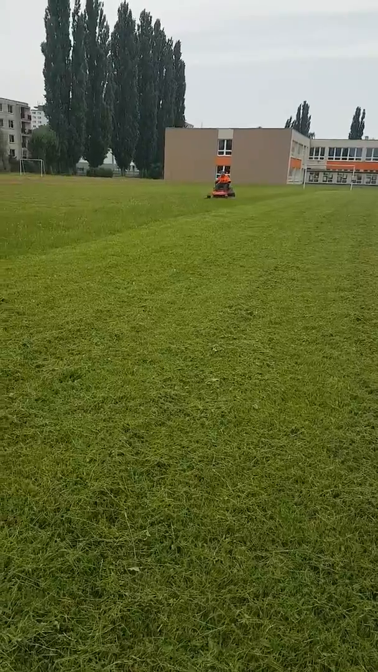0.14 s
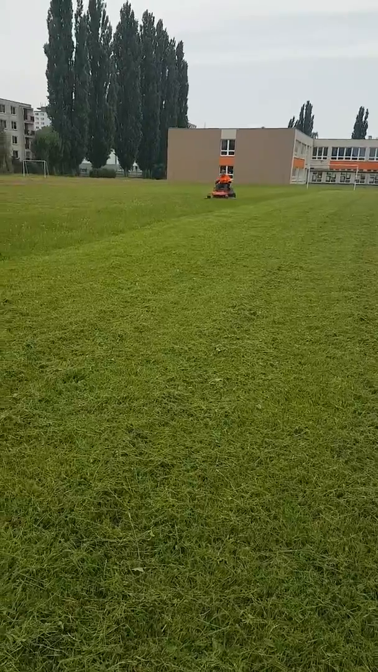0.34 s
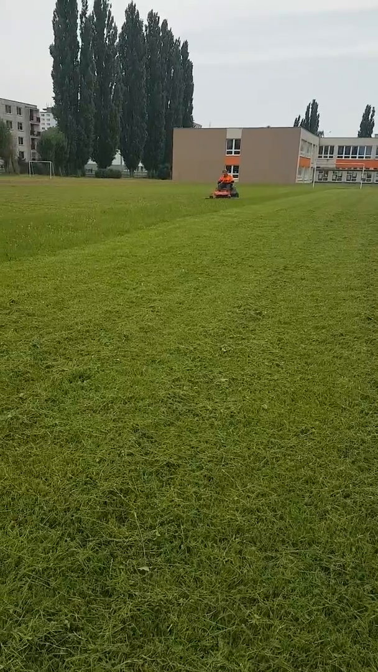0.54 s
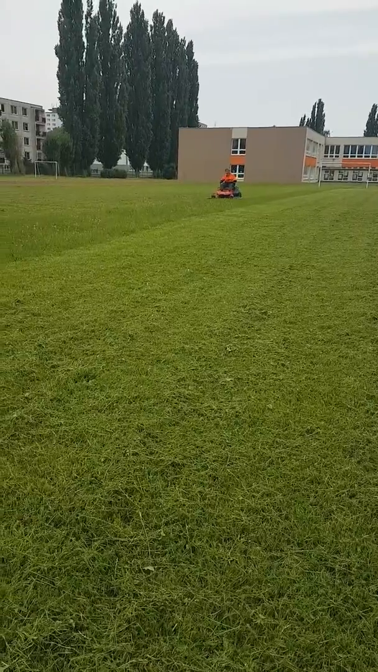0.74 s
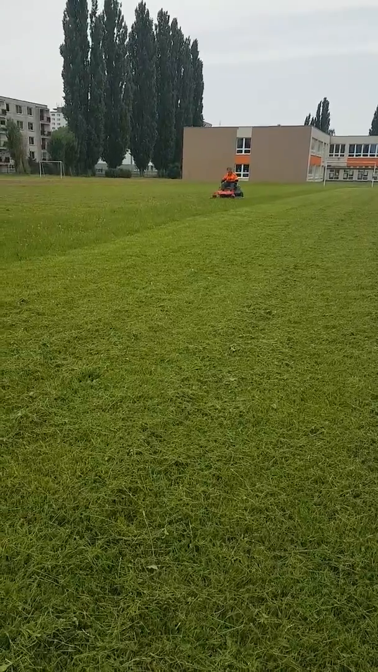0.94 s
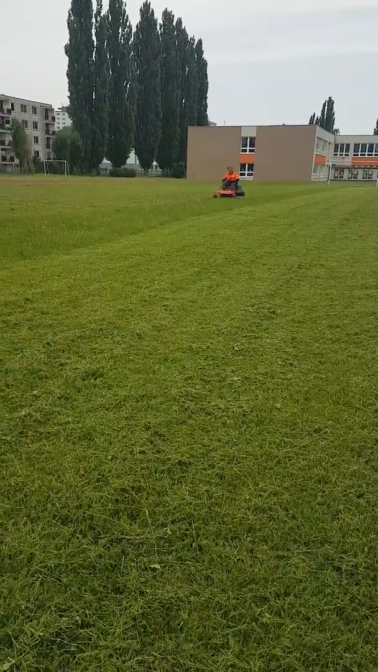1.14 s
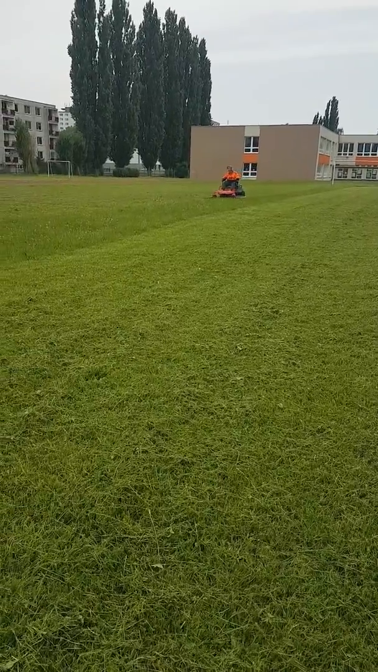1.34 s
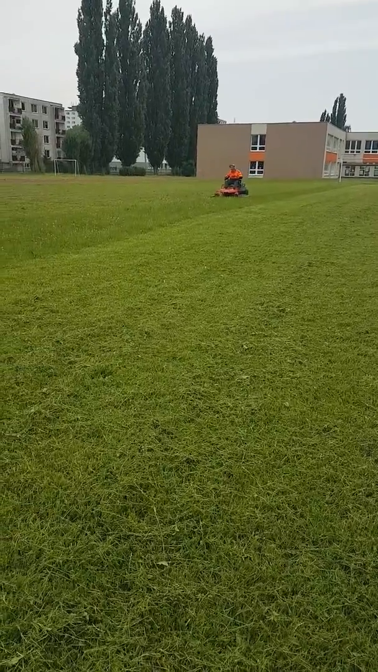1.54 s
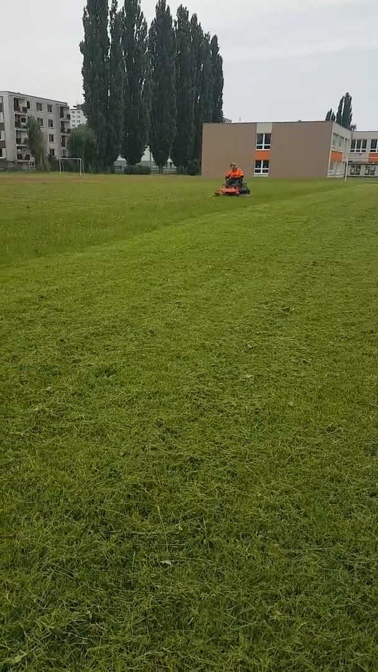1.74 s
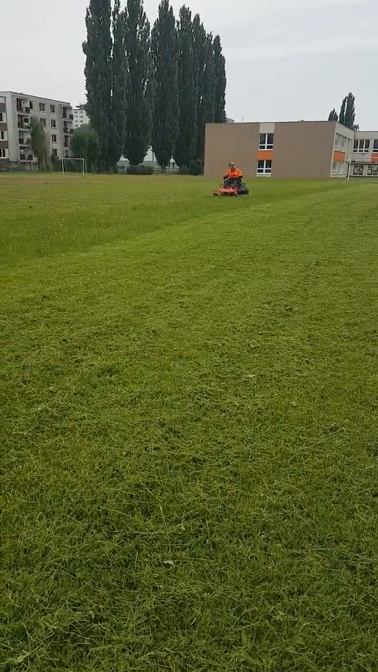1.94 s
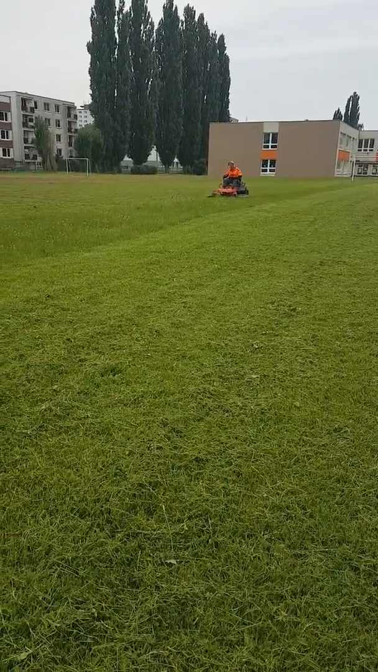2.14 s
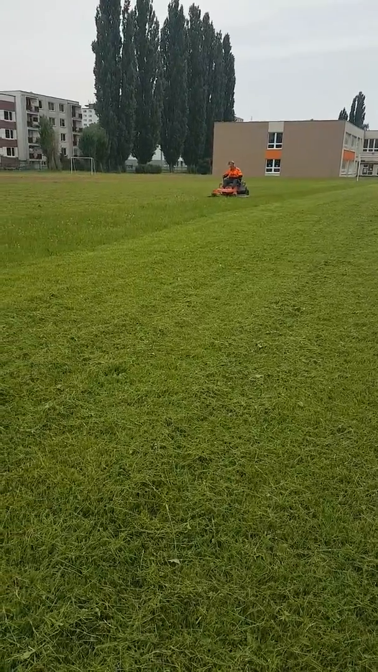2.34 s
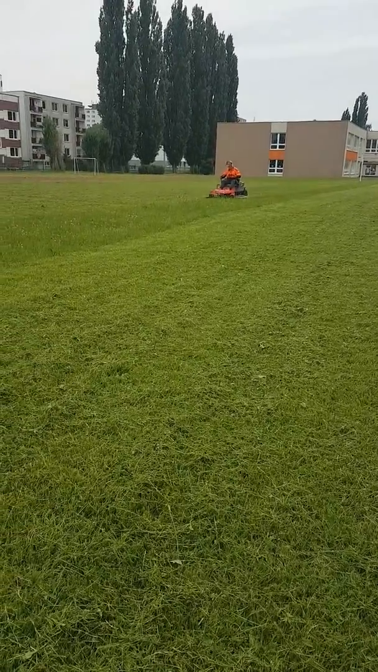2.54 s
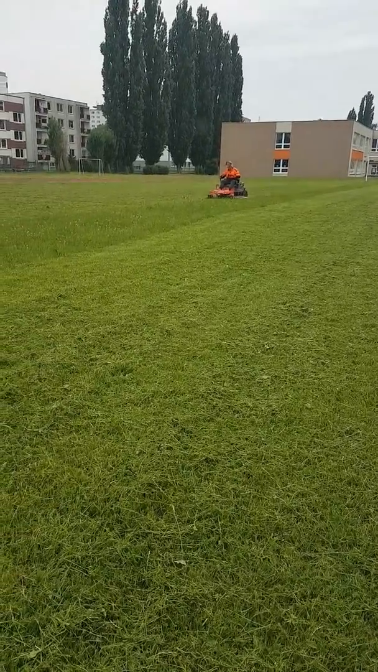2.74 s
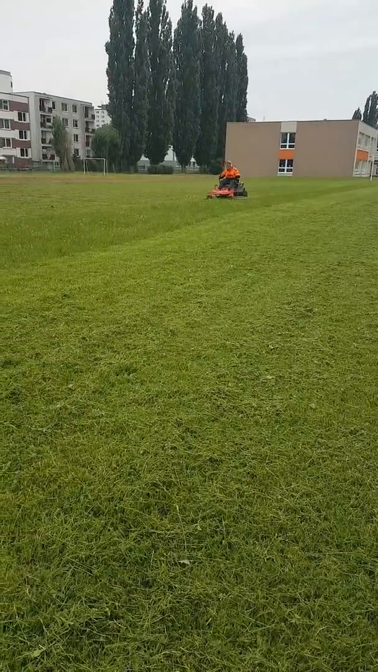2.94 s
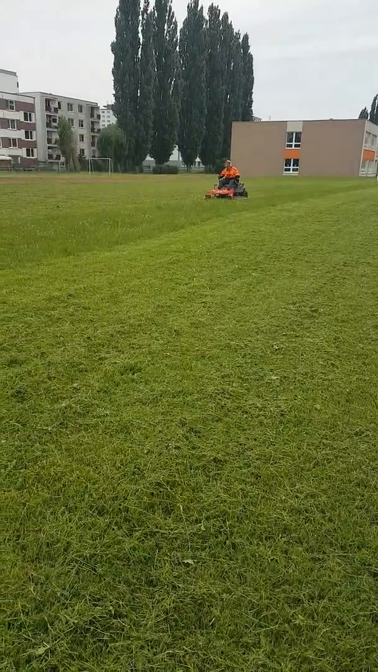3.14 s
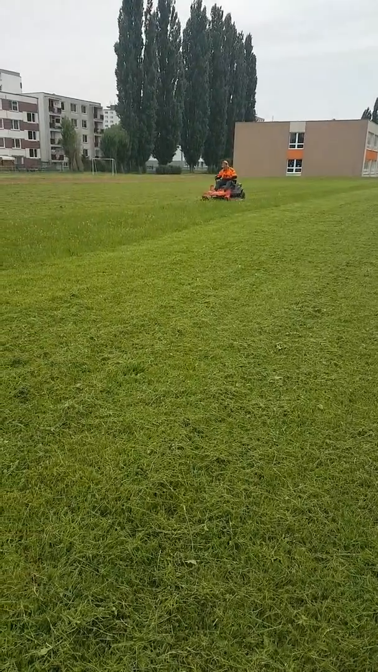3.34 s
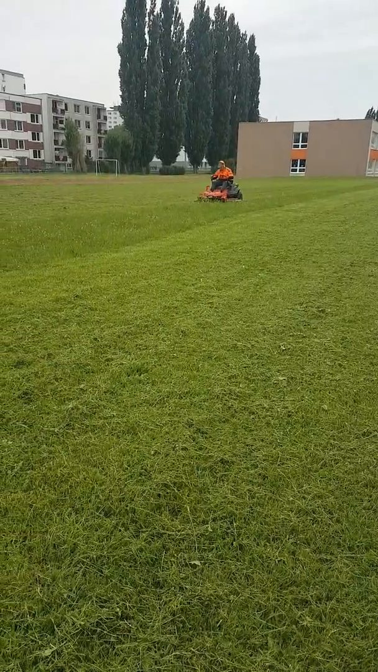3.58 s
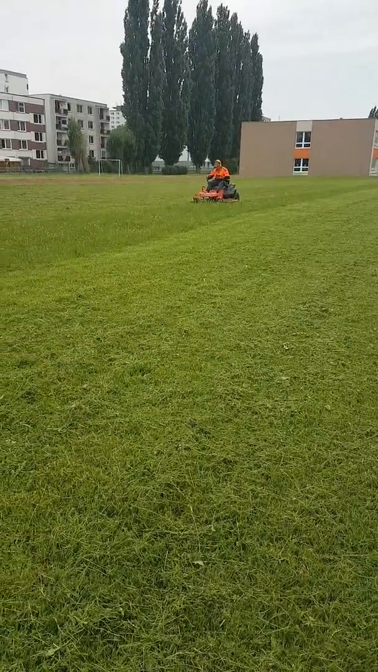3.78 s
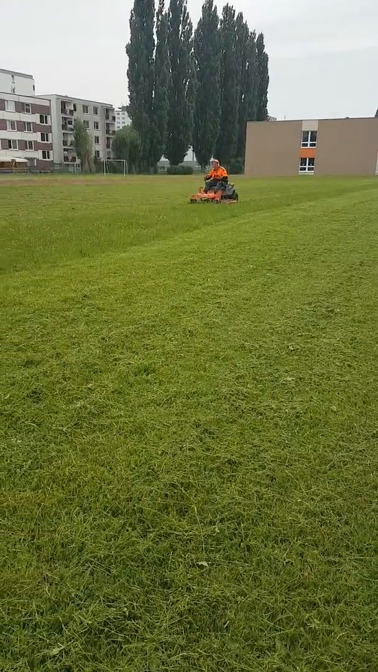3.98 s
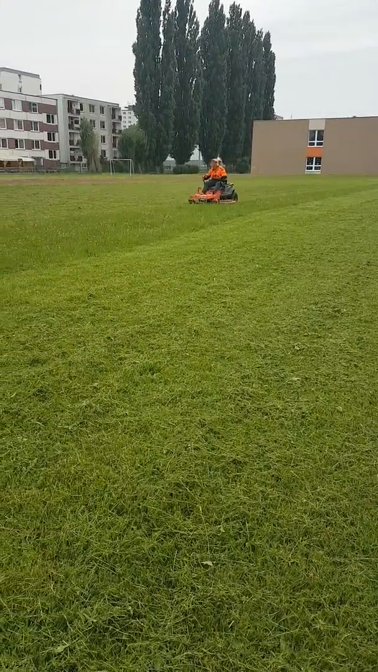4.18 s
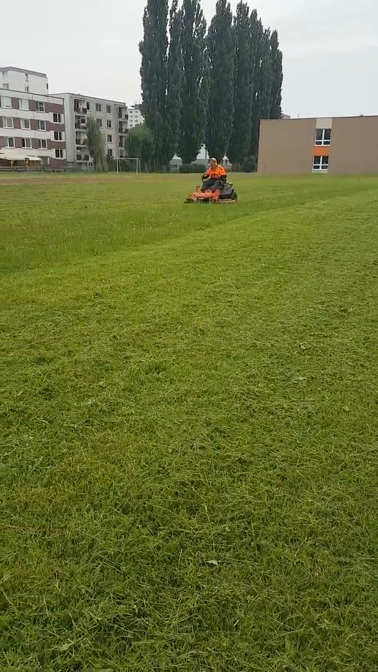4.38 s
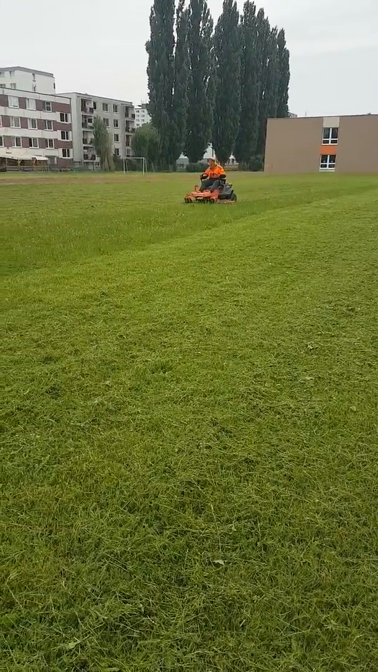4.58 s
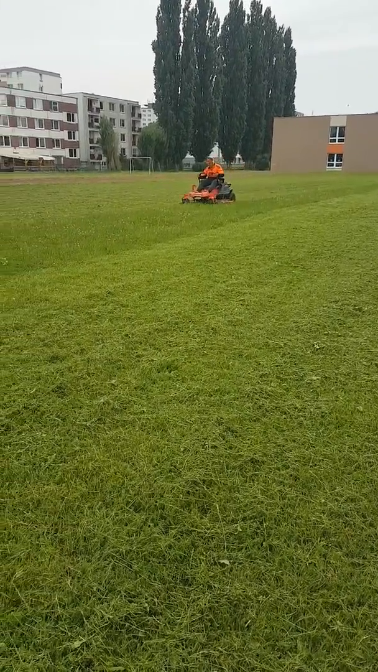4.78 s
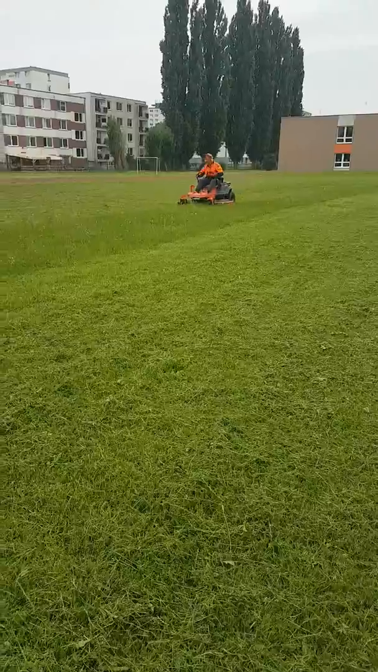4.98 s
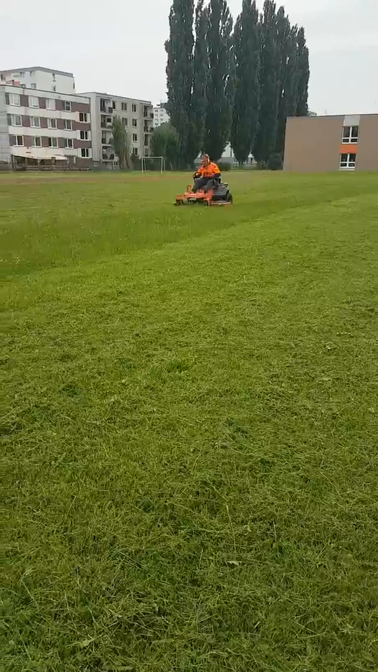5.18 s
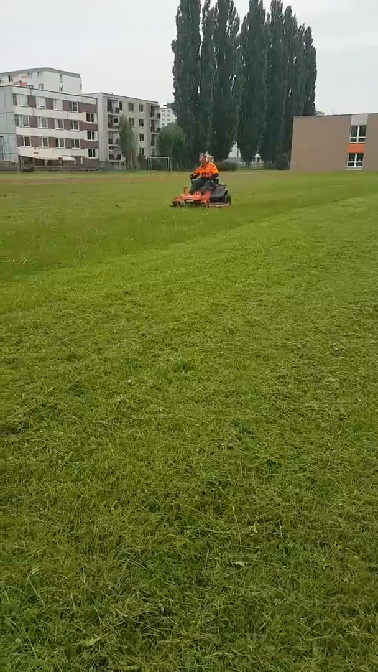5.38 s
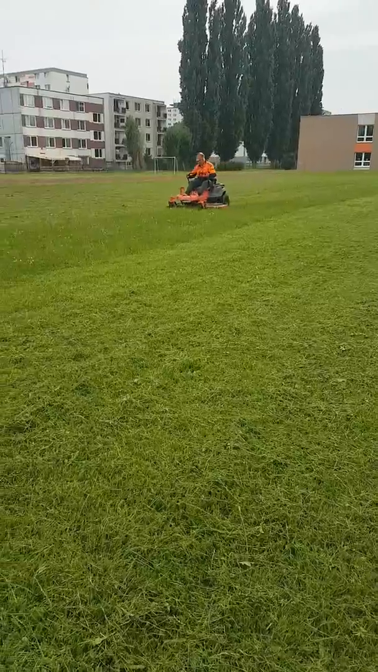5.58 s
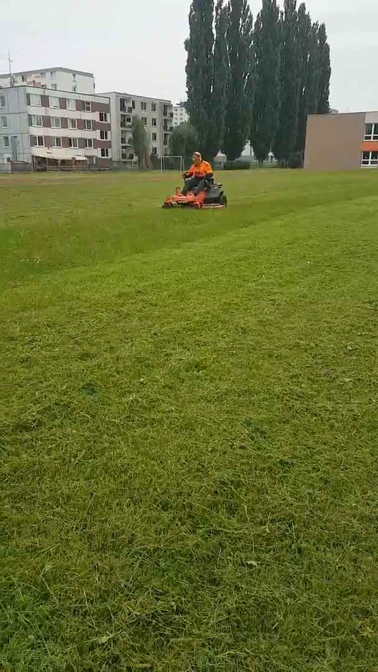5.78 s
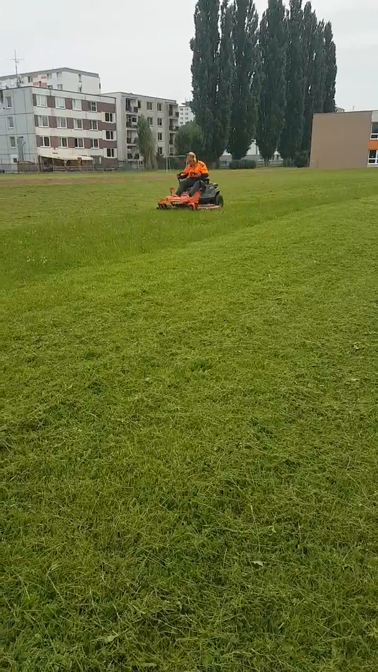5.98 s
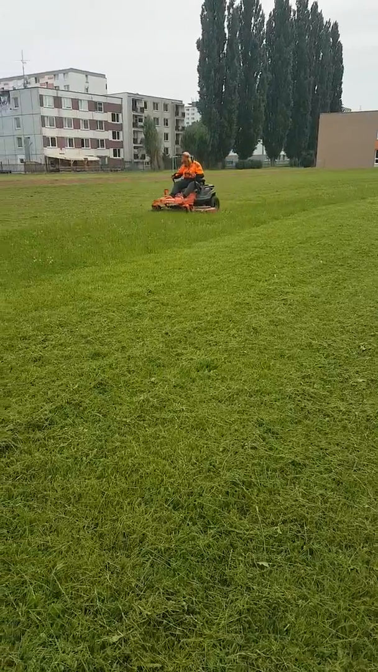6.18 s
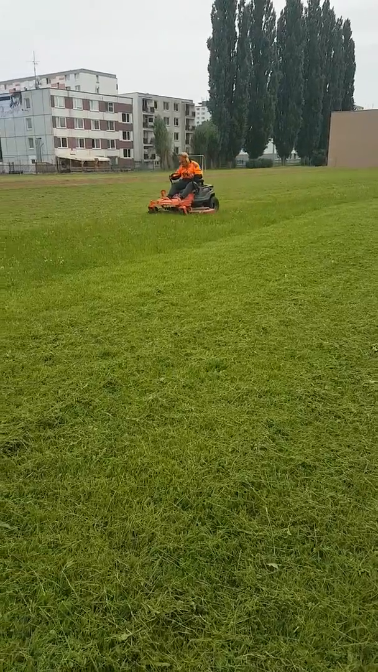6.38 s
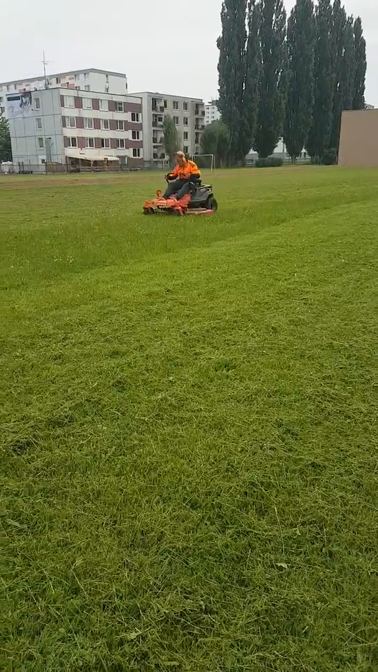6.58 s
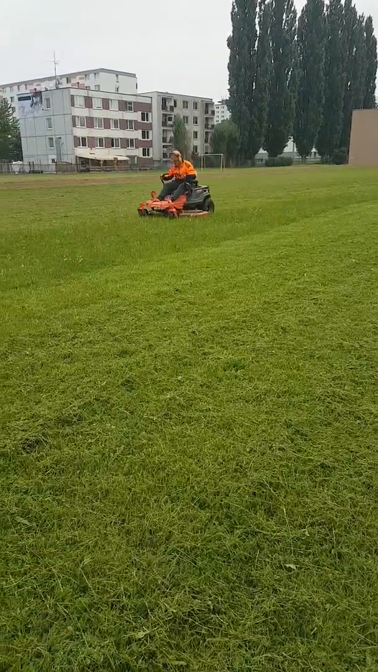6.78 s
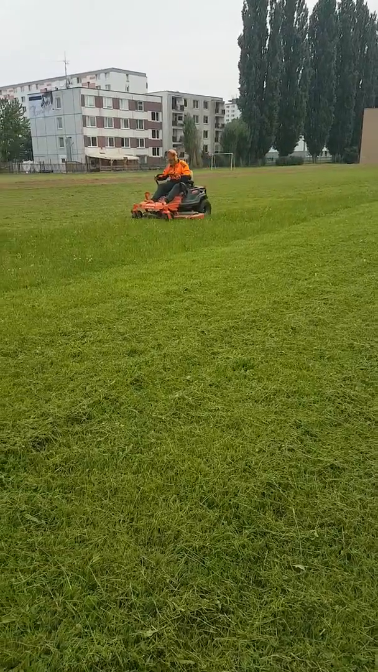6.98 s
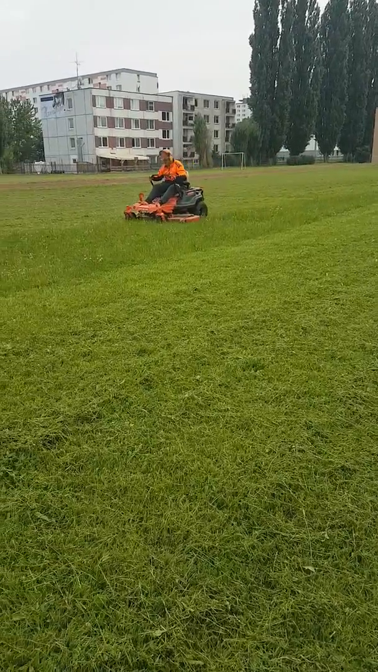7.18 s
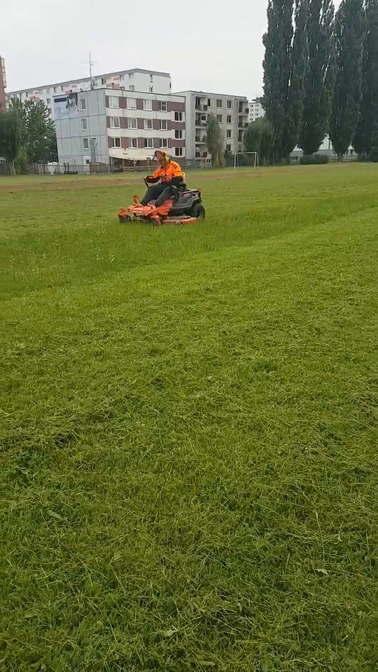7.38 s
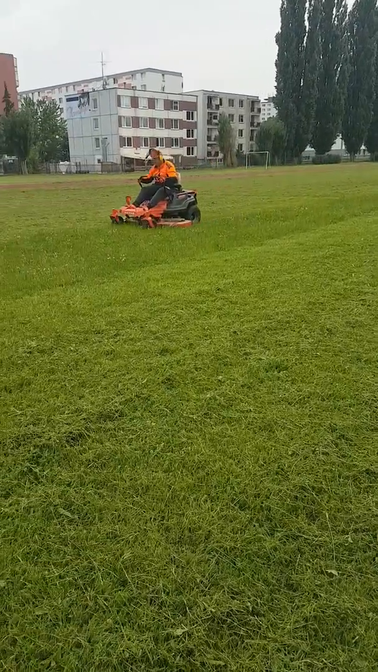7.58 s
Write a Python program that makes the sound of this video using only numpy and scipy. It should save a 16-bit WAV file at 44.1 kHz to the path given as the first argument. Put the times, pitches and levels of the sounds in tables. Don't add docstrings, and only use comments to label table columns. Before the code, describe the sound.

Outdoors on a wide lawn, a riding mower approaches at a steady drive. Its engine throbs evenly with slight speed changes, blade hum wavers, and a rough grassy roar steadily grows. Early on, fingers knock the hand-held stereo microphone and a short wind puff brushes it. Sparse grit snaps become clearer later, before the bass abruptly opens up and wind buffets at the end.

```python
import sys
import numpy as np
from scipy import signal
from scipy.fft import rfft, irfft, next_fast_len
from scipy.io import wavfile
from scipy.ndimage import uniform_filter1d

SR = 44100
rng = np.random.default_rng(int(sys.argv[2]) if len(sys.argv) > 2 else 0)


def ratio_of_db(decibels):
    return 10 ** (np.asarray(decibels, float) / 20)


def int16_out(signal):
    q = np.round(np.clip(np.atleast_2d(signal).T, -1, 1) * 32767)
    wavfile.write(sys.argv[1], SR, q.astype(np.int16))


N = 336042
HZ = np.maximum(np.fft.rfftfreq(next_fast_len(N + 4096), 1 / SR), 1)

# time_s, speed_cycles_per_s (four-stroke cycles)
ENGINE_SPEED = [(0, 23.3), (.3, 23.3), (1.0, 23.6), (1.75, 23.52), (2.0, 23.64), (2.9, 23.86), (3.3, 23.9),
                (3.6, 23.5), (4.05, 23.65), (4.6, 24.24), (4.92, 23.38), (5.22, 23.76), (5.5, 23.62),
                (5.85, 23.94), (6.75, 23.86), (7.05, 23.72), (7.5, 24.1), (7.62, 24.1)]
# multiple_of_cycle, level_db
ENGINE_ORDERS = [(1, -32), (2, -11.5), (3, -17.5), (4, -15), (5, 1.5), (6, -5.5), (6.5, -11.5), (7, -17),
                 (8, -3), (9, -8), (10, -19), (11, -7.5), (12, -23), (13, -6.5), (14, -6), (15, -13),
                 (16, -23), (17, -23.5), (18, -10.5)]
BELT_AND_UPPER_TONES = 4.51, [(6, -67), (7, -60), (8, -62)]
# multiple_of_blade_pass, level_db, low_cut_gain_db (once it lets go)
BLADE_HUM = [(1, -54, 13), (2, -50.5, 6.5), (3, -50, 0.5), (4, -60.5, -2.5)]
# middle_s, half_length_s, multiple_of_blade_pass, gain_db
IN_STEP = [(.4, 0.2, 1, 13), (1.0, .15, 1, 17), (3.9, 1, 1, 14), (5.704, 0.89, 1, 13), (7.4, .5, 1, 13),
           (.6, .35, 2, 10), (2.256, 0.38, 2, 13), (4.05, 0.36, 2, 10), (5.08, 0.29, 2, 11.5),
           (6.247, 0.47, 2, 12), (6.984, 0.33, 2, 15), (7.507, 0.18, 2, 8), (3.55, 0.13, 2, 8.5),
           (.5, 0.18, 3, 8), (1.017, 0.18, 3, 7), (2.092, 0.23, 3, 7.5), (2.65, 0.13, 3, 7.5),
           (3.24, 0.13, 3, 7.5), (3.83, 0.21, 3, 8.5), (4.366, 0.16, 3, 5.5), (5.106, 0.25, 3, 7.5),
           (5.93, 0.37, 3, 5), (6.372, 0.18, 3, 6), (7.012, 0.21, 3, 12.5), (4.004, .3, 4, 7),
           (5.302, .45, 4, 10.5), (6.996, 0.65, 4, 14.5)]
# pitch_hz, level_db (per Hz)
ROAR_SPECTRUM = [(25, 4), (80, 6.5), (115, 12.5), (180, 11.5), (280, 11.5), (400, 8), (600, 0.5), (1500, 2),
                 (2500, -4), (4000, 1), (6000, -8.5), (9000, -18.5), (12000, -14.5), (15500, -26)]
# pitch_hz, share_0_to_1
SCATTER = [(40, .25), (100, .07), (500, .1), (1000, .05), (3000, .05), (5000, .1), (8000, .18),
           (13000, .45)]
# middle_s, half_length_s, gain_db (over the calm)
GUSTS = [
    (.5, .6, 4),
    (1.68, .08, 12),
    (4.6, 1, 0.5),
    (6.9, 0.062, 11),
    (7.55, .2, 14),
]
# start_s, peak_db
TICKS = [(0.6479, -55), (1.8113, -50), (2.8679, -49), (3.2201, -39), (3.4501, -35), (3.6391, -37),
         (3.8397, -46), (5.5653, -30), (5.9412, -26), (6.6713, -23), (7.327, -26)]
# start_s, peak_db, pitch_hz (below zero starts as a pull), left_minus_right_db
HANDLING = [
    (1.6365, -21, 95, 0),
    (1.6585, -28, -380, -14),
    (1.665, -33, 900, -14),
    (1.6742, -23.5, 560, -14),
    (1.6795, -26, 330, -14),
    (1.695, -25, -190, -10),
    (1.6995, -17.5, 115, -4),
    (1.71, -26, 170, 6),
]
# pitch_hz, width_hz, gain_db
LEFT_COLOUR = [(391, 68, -6.3), (468, 58, -12.6), (578, 900, 13.0), (871, 334, -5.6), (1248, 75, -13.8),
               (1724, 120, 7.3), (1882, 256, -15.8), (2070, 1800, 14.0), (2727, 242, -9.6),
               (3329, 152, -8.9), (4165, 528, -7.8), (5280, 900, -4.5), (7339, 2410, 6.2),
               (14386, 3266, 8.9)]
RIGHT_COLOUR = [(364, 486, 9.8), (508, 64, -8.8), (1171, 167, 8.3), (1455, 91, -9.8), (1735, 194, 13.6),
                (1824, 218, -9.5), (2407, 601, 16.0), (2800, 407, -12.0), (3345, 537, 8.1),
                (4165, 264, -8.2), (5098, 135, -7.1), (7422, 504, -14.7), (8666, 1154, -11.6),
                (9486, 198, -9.0), (12770, 434, -13.0), (13904, 720, -3.8)]
# pitch_hz, width_hz
LEFT_TURNS = [(1250, 41)]
RIGHT_TURNS = [(1907, 164), (4182, 135), (5080, 63)]

START_M, DRIVE_M_PER_S, LAWN_DB_PER_M = 44.87, 4.06, 0.1497
ENGINE_FOLLOWS, BLADE_FOLLOWS, BASS_FOLLOWS, HISS_FOLLOWS = 0.42, 0.47, 0.22, 0.85
ENGINE_DB, ROAR_DB, BASS_DB, HISS_DB = -45.5, -46.5, 6, -1.5
OPEN_S, OPEN_TIME_S = 6.755, 0.12
ENGINE_OPEN_DB, BASS_OPEN_DB, WIND_OPEN_DB, HISS_OPEN_DB = 13, 18, 21, -2
FLURRY_DB, HUM_FLICKER_DB = 0.78, 1.5
CALM_DB, WIND_RUMBLE_DB = -59.5, -3.5
RIGHT_LAG_S, RIGHT_DB = 0.000106, 1.3
SELF_NOISE_DB = -86


def rms_one(x):
    return x / np.sqrt(np.mean(x ** 2) + 1e-20)


def in_time(rows):
    s, *columns = np.transpose(rows)
    return [np.interp(np.arange(N) / SR, s, c) for c in columns]


def at_hz(points, hz):
    table_hz, value = np.array(points).T
    return np.interp(np.log(hz), np.log(table_hz), value)


def drift(rate_hz):
    r = np.exp(-80 * np.pi * rate_hz / SR)
    white = rng.standard_normal(N // 40 + 2002)
    slow = signal.lfilter([1], [1, -2 * r, r * r], white)[2000:]
    return np.interp(np.arange(N) / 40, np.arange(len(slow)), rms_one(slow))


def band(x, low_hz, high_hz):
    return signal.sosfilt(signal.butter(2, [low_hz, high_hz], "band", fs=SR, output="sos"), x)


def coloured(x, gain):
    size = 2 * len(HZ) - 2
    return irfft(rfft(x, size) * gain, size)[..., :N]


def turns(per_s):
    return 2 * np.pi * np.cumsum(per_s) / SR


def swell(s, half_s):
    return np.exp(-((np.arange(N) / SR - s) / half_s) ** 4)


def nearing_db():
    metres = np.maximum(START_M - DRIVE_M_PER_S * np.arange(N) / SR, 2)
    return 20 * np.log10(START_M / metres) + LAWN_DB_PER_M * (START_M - metres)


def engine(cycle, bass_db, roar_db):
    out = 0
    starts = rng.uniform(0, 2 * np.pi, len(ENGINE_ORDERS))
    for (k, db), start in zip(ENGINE_ORDERS, starts):
        bass = np.clip((14 - k) / 5, 0, 1)
        level_db = bass * bass_db + (1 - bass) * (roar_db - 5) + db + 0.56 * drift(3.4)
        sway = 0.12 * drift(4)
        out = out + ratio_of_db(level_db) * np.sin(k * cycle + start + sway)
    return out


def blade_levels(near_db, opened):
    levels = [db + BLADE_FOLLOWS * near_db + open_db * opened for _, db, open_db in BLADE_HUM]
    for s, half_s, k, db in IN_STEP:
        i = round(k) - 1
        levels[i] = levels[i] + db * swell(s, half_s)
    return levels


def blades(cycle, levels, roar_db):
    passes_per_cycle, upper = BELT_AND_UPPER_TONES
    phase = passes_per_cycle * cycle + 0.09 * drift(7)
    near_db = 0.2 * (roar_db - roar_db[0])
    tones = [*enumerate(levels, 1), *((k, db + near_db) for k, db in upper)]
    out = 0
    for k, db in tones:
        flicker_db = HUM_FLICKER_DB * drift(10.2)
        out = out + ratio_of_db(db - 3.5 + flicker_db) * np.sin(k * phase)
    return out


def bass_share(hz):
    return np.clip(np.log2(330 / hz) / 0.79, 0, 1)


def roar(cycle, level_db, lift_db, hiss_db):
    edges = 22 * 2 ** np.arange(0, 9.6, 0.5)
    white = rng.standard_normal((2, 3, N))
    throb_db = 0.35 * np.cos(cycle)
    flurries = drift(12) + 0.9 * drift(25)
    flurries = flurries - uniform_filter1d(flurries, size=SR // 5)
    grain_db = 2.3 * np.minimum(rng.exponential(1, N), 6)
    grit = ratio_of_db(grain_db * (rng.random(N) < 0.05))
    near_db = level_db - level_db.mean()
    out = 0
    for k, (low, high) in enumerate(zip(edges, edges[1:])):
        hz = np.sqrt(low * high)
        bright = np.clip(np.log2(hz / 3000), 0, 1)
        air_db = 0.72 * near_db * np.clip(np.log2(hz / 7000), 0, 1)
        db = bass_share(hz) * lift_db + bright * (hiss_db + FLURRY_DB * flurries)
        db = db + air_db + 0.92 * drift(9.5) + throb_db
        share = np.clip(at_hz(SCATTER, hz), 0, 1)
        noise = band(white[k % 2] * (1 + bright * (grit - 1)), low, high)
        out = out + ratio_of_db(db) * noise * np.sqrt([[1 - share], [share], [share]])
    return coloured(ratio_of_db(level_db + 2.5) * out, ratio_of_db(at_hz(ROAR_SPECTRUM, HZ)))


def wind(opened):
    gust_db = sum(db * swell(s, half_s) for s, half_s, db in GUSTS)
    level_db = CALM_DB + WIND_OPEN_DB * opened + gust_db
    lumps = ratio_of_db(level_db + 3 * drift(9.3) + [[-1], [1]])
    white = rng.standard_normal((2, 2, N))
    puff = rms_one(band(band(white[0], 92, 190), 60, 220))
    rumble = rms_one(band(band(white[1], 33, 114), 33, 114))
    return lumps * (puff + ratio_of_db(WIND_RUMBLE_DB) * rumble)


def ticks():
    clicks = np.zeros(N)
    for s, db in TICKS:
        clicks[round(s * SR)] = ratio_of_db(db - 8)
    burst = signal.lfilter([1], [1, -0.985], clicks) * rng.standard_normal(N)
    return band(burst, 5500, 15500)


def handling():
    out = np.zeros((2, N))
    t = np.arange(2048) / SR
    for s, db, hz, pan_db in HANDLING:
        knock = np.sin(2 * np.pi * hz * t) * np.exp(-t * abs(hz) * 1.6)
        side_db = db + pan_db * np.array([[0.5], [-0.5]])
        i = round(s * SR)
        out[:, i:i + len(t)] += ratio_of_db(side_db) * knock
    return out


def low_cut_open():
    return 0.5 + 0.5 * np.tanh((np.arange(N) / SR - OPEN_S) / (2 * OPEN_TIME_S))


def port(x, colour, phase_turns, lag_s):
    h = np.exp(-2j * np.pi * HZ * lag_s)
    for hz, width, db in colour:
        off = hz ** 2 - HZ ** 2
        h = h * (off + 1j * HZ * width * ratio_of_db(db / 2)) / (off + 1j * HZ * width / ratio_of_db(db / 2))
    for hz, width in phase_turns:
        off = hz ** 2 - HZ ** 2
        h = h * (off - 1j * HZ * width) / (off + 1j * HZ * width)
    return coloured(x, h)


def scene():
    near_db, opened = nearing_db(), low_cut_open()
    roar_db = ROAR_DB + near_db + 0.19 * drift(7.5)
    lift_db = BASS_DB + (BASS_FOLLOWS - 1) * near_db + BASS_OPEN_DB * opened + 0.57 * drift(2.2)
    hiss_db = HISS_DB + (HISS_FOLLOWS - 1) * near_db + HISS_OPEN_DB * opened
    engine_db = ENGINE_DB + ENGINE_FOLLOWS * near_db + ENGINE_OPEN_DB * opened
    cycle = turns(in_time(ENGINE_SPEED)[0])

    direct, left, right = roar(cycle, roar_db, lift_db, hiss_db)
    direct = direct + engine(cycle, engine_db, roar_db)
    direct = direct + blades(cycle, blade_levels(near_db, opened), roar_db)
    direct = direct + ticks()
    left = port(direct + left, LEFT_COLOUR, LEFT_TURNS, 0)
    right = ratio_of_db(RIGHT_DB) * port(direct + right, RIGHT_COLOUR, RIGHT_TURNS, RIGHT_LAG_S)
    return np.array([left, right]) + handling() + wind(opened)


def band_limit(x):
    return signal.sosfilt(signal.butter(12, 15690, fs=SR, output="sos"), x)


def record(dry):
    hiss = ratio_of_db(SELF_NOISE_DB) * rms_one(band(rng.standard_normal(dry.shape), 9000, 16000))
    mix = signal.sosfilt(signal.butter(1, 24, "high", fs=SR, output="sos"), dry + hiss)
    return band_limit(mix)


dry = scene()
out = record(dry)
int16_out(out)
```